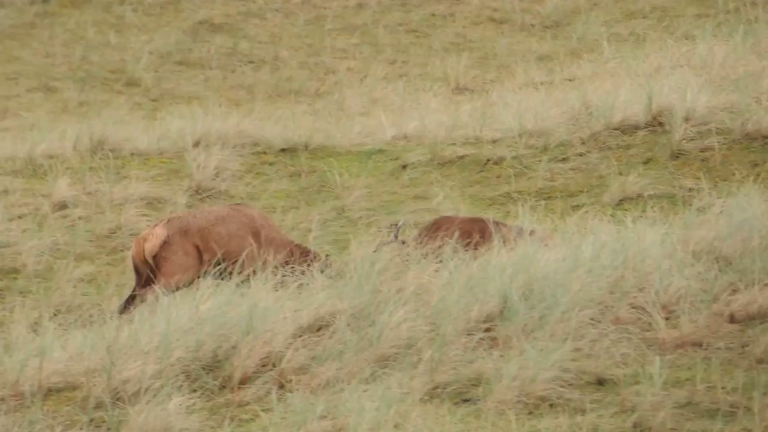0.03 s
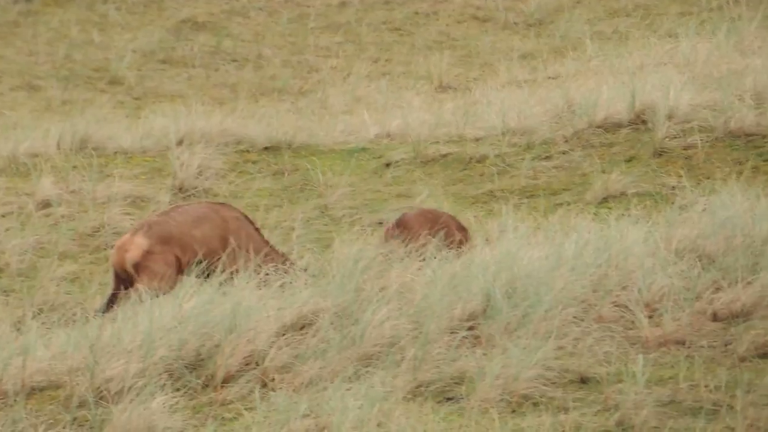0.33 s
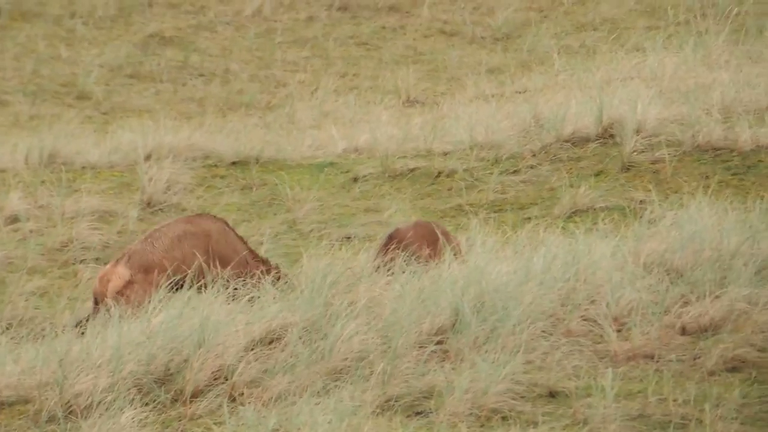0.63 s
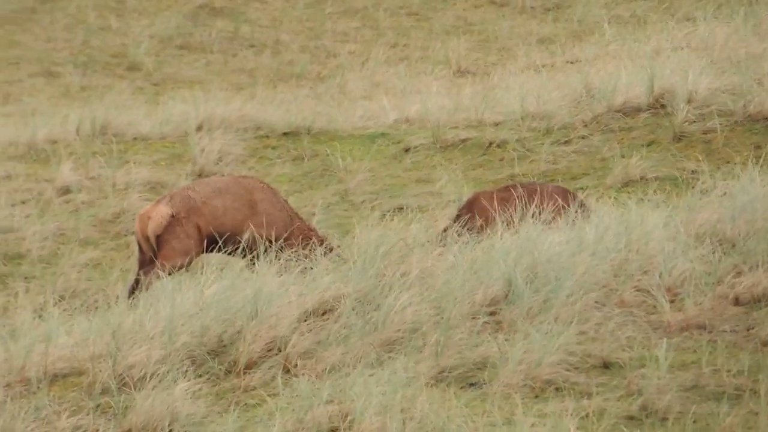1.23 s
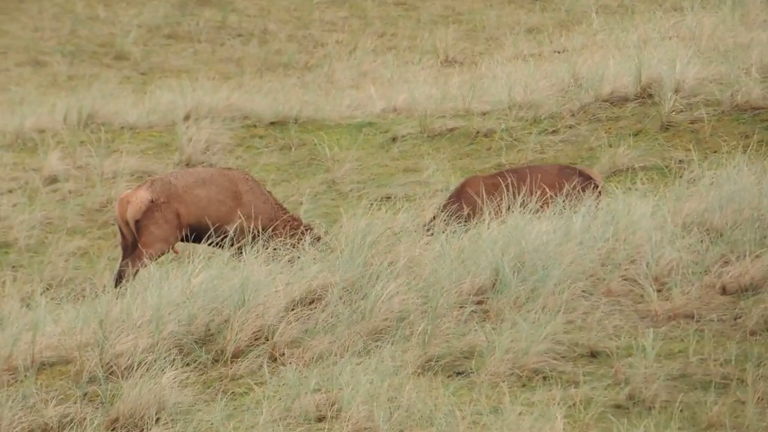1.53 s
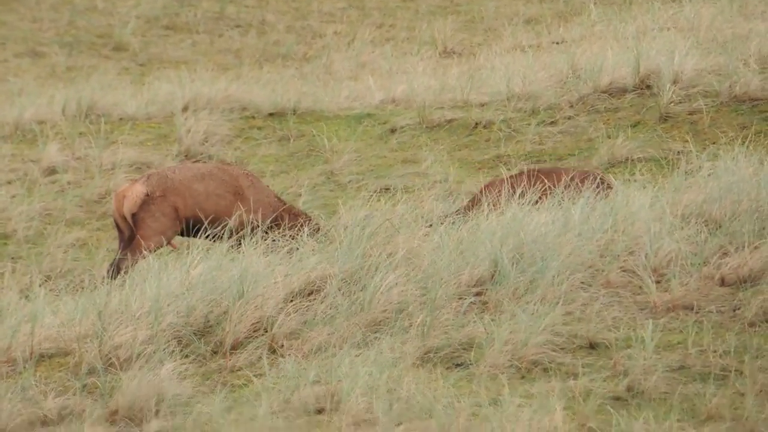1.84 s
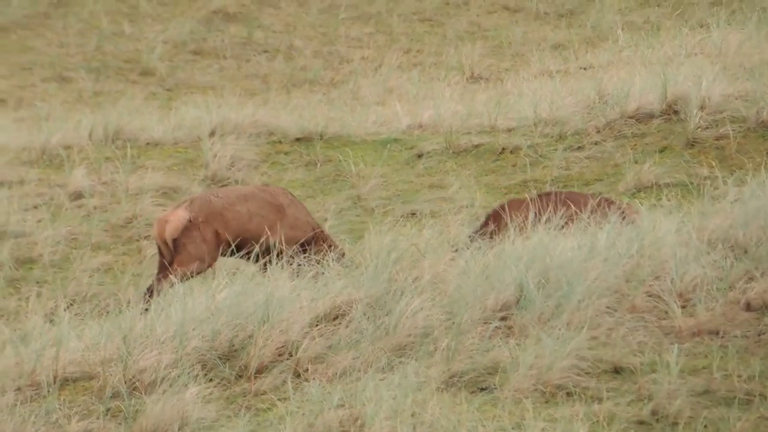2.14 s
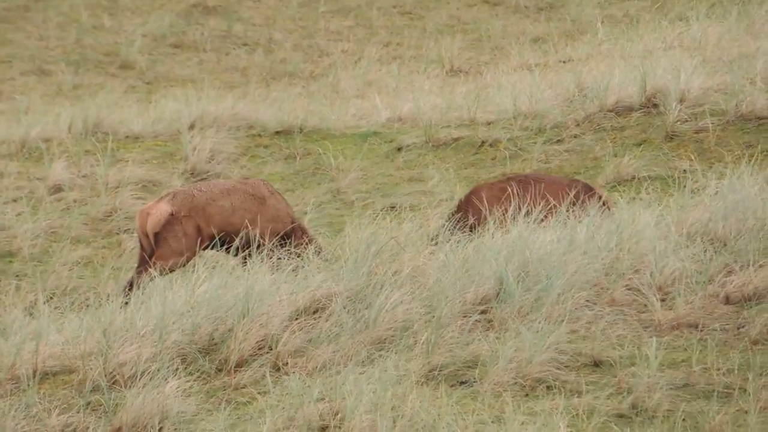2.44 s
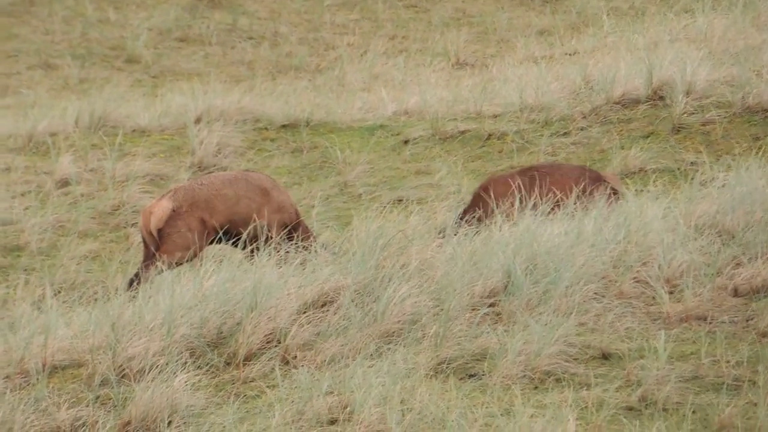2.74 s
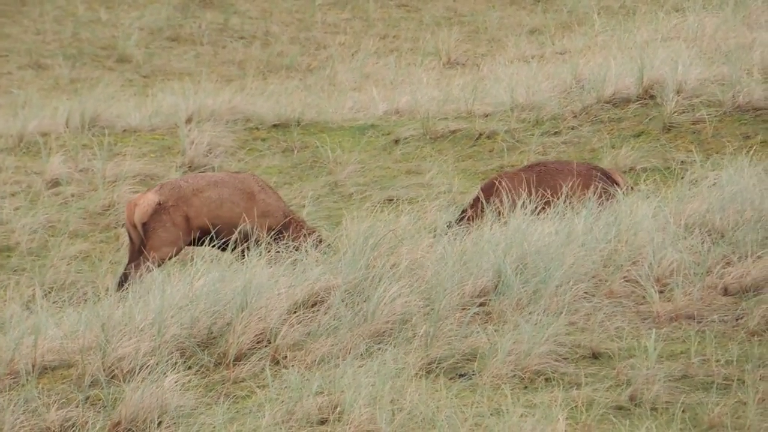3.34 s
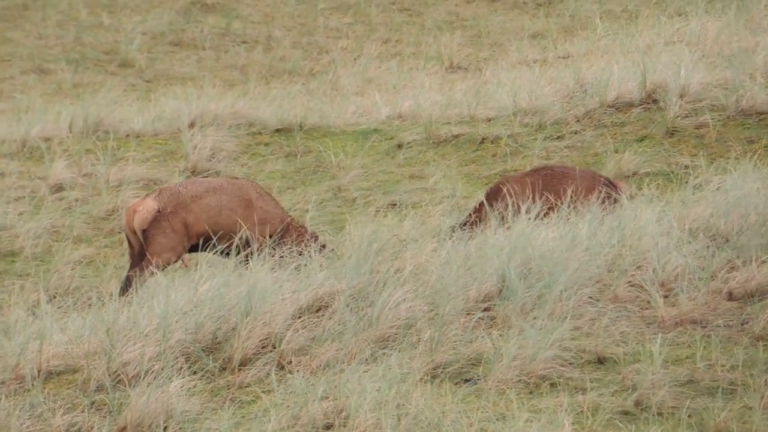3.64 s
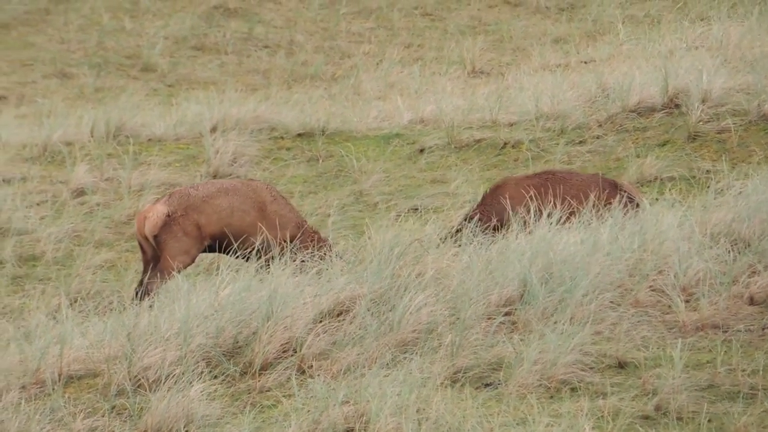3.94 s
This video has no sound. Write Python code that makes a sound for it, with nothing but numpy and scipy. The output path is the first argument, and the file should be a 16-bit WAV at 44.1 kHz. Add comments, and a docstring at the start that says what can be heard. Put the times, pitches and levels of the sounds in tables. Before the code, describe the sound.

Deer antlers click and knock unevenly while wind hisses and buffets the microphone.

```python
"""A grassy hillside in wind, with two stags sparring far off.
Dry knocks and ticks sound with no echo: perhaps antlers, perhaps drops tapping close to the microphone.
Each knock is an impulse ringing a damped body; each tick is a tiny burst of bright noise.
Wind buffets the two microphone ports separately, mostly the right, over faint scrapes and a steady hiss."""
import sys
import numpy as np
from scipy import signal
from scipy.fft import rfft, irfft
from scipy.io import wavfile
from scipy.ndimage import uniform_filter1d

SR = 44100
rng = np.random.default_rng(int(sys.argv[2]) if len(sys.argv) > 2 else 0)


def int16_out(signal):
    """Quantize to a 16-bit WAV file."""
    q = np.round(np.clip(np.atleast_2d(signal).T, -1, 1) * 32767)
    wavfile.write(sys.argv[1], SR, q.astype(np.int16))


N = 176400
SHORT = 2048  # samples in one tick or knock


def amp(db):
    """Decibels to gain."""
    return 10 ** (np.asarray(db) / 20)


def unit(x):
    """Scales to rms 1."""
    return x / np.sqrt(np.mean(x ** 2) + 1e-20)


def read(points, hz):
    """Reads a table on a log-frequency axis."""
    f, value = np.transpose(points)
    return np.interp(np.log(hz + 1), np.log(f + 1), value)


def add(mix, s, sound):
    """Adds a stereo sound at time s."""
    part = mix[:, max(round(s * SR), 0):][:, :sound.shape[1]]
    part += sound[:, :part.shape[1]]


def split(difference):
    """Shares a left-right difference between the two ports."""
    return np.array([[.5], [-.5]]) * difference


def mode(f, hz, q):
    """Response of one damped mode, gain 1 at its pitch."""
    u = 1j * f / hz
    return 1 / (q * (1 + u * u) + u)


def low_cut(f, hz):
    """Response of a gentle bass roll-off."""
    return 1j * f / (1j * f + hz)


def band_noise(hz, q, size):
    """Stereo noise in one broad resonance with steep sides."""
    f = np.fft.rfftfreq(size, 1 / SR)
    white = rfft(rng.standard_normal((2, size)))
    return unit(irfft(white * f * mode(f, hz, q) ** 2, size))


def air():
    """A soft wash of wind in grass, alike at both ports, turning into microphone hiss in the treble."""
    # Each row: frequency in Hz, relative spectral level in dB.
    spectrum = [(30, -6), (300, .3), (500, -2.3), (860, -3), (1600, -10.2), (3900, -15), (7800, -15.8),
                (14000, -16.2)]
    # Each row: frequency in Hz, correlation of left and right.
    correlation = [(60, .5), (380, .85), (950, .75), (2400, .3), (8000, .05)]
    # Each row: frequency in Hz, left minus right in dB.
    balance = [(200, -2.5), (5000, -.2), (14000, -1.5)]
    frames, hz = N // 256 + 5, np.fft.rfftfreq(1024, 1 / SR)
    a, b, c, d, patches = rng.standard_normal((frames, len(hz), 5)).T
    patches = unit(uniform_filter1d(uniform_filter1d(patches, size=12, axis=0), size=12, axis=1))
    swell = unit(uniform_filter1d(rng.standard_normal(frames), size=50))
    drift_db = 1.2 * patches + .4 * swell  # the wash wavers band by band and as a whole
    alike = read(correlation, hz)[:, None]
    left = a + 1j * b
    right = alike * left + np.sqrt(1 - alike ** 2) * (c + 1j * d)
    pan = amp(read(balance, hz) / 2)[:, None]
    bands = np.array([left * pan, right / pan]) * amp(read(spectrum, hz)[:, None] + alike * drift_db)
    _, wash = signal.istft(bands, nperseg=1024, noverlap=768)
    return amp(-49.6) * unit(wash[:, :N])


def wind():
    """Low turbulence right on the microphone, gusting separately at each port."""
    # One table a port. Each row: time in seconds, level in dB.
    left_gusts = [(.2, -45), (.75, -58), (1.1, -43), (1.8, -38), (2, -51), (2.5, -50), (2.84, -37),
                  (3.05, -50), (3.27, -38), (3.5, -52)]
    right_gusts = [(.1, -36), (.65, -45), (1.1, -33), (1.7, -29), (2.02, -37), (2.2, -34), (2.75, -39),
                   (3.1, -44), (3.25, -39), (3.42, -45), (3.75, -43), (3.9, -34)]
    # Each row: frequency in Hz, relative spectral level in dB.
    spectrum = [(10, -12), (25, -4), (55, 0), (85, -4), (125, -10), (190, -21), (320, -33), (2000, -80)]
    out, t, f = np.zeros((2, N)), np.arange(N) / SR, np.fft.rfftfreq(N, 1 / SR)
    for port, gusts in enumerate((left_gusts, right_gusts)):
        rumble = unit(irfft(rfft(rng.standard_normal(N)) * amp(read(spectrum, f)), N))
        out[port] = amp(np.interp(t, *np.transpose(gusts))) * rumble
    return out


def ticks(decay_s=.0012, pan_db=-4):
    """Tiny fizzy bursts, a little to the right, that die in a few milliseconds."""
    # Each row: start in seconds, level in dB, centre in Hz.
    bursts = [(.1566, -28, 5000), (1.5295, -30, 12000), (2.103, -31, 11000), (2.409, -29, 12000),
              (2.6713, -31, 11000), (3.0277, -26, 11500), (3.2063, -32, 8000)]
    out, fade = np.zeros((2, N)), np.exp(-np.arange(SHORT) / SR / decay_s)
    for s, db, hz in bursts:
        add(out, s, amp(db + split(pan_db)) * fade * band_noise(hz, q=.9, size=SHORT))
    return out


def buffets(half_width_cycles=1.2, roughness=.3):
    """An eddy passes one port: a low thud of two or three uneven pressure swings."""
    # Left port, then right. Each row: time of the peak in seconds, peak in dB, centre in Hz.
    eddies = {"left": [(.185, -27, 100), (2.8, -31, 130)], "right": [(.705, -35, 160), (1.135, -26, 120),
              (2.126, -22, 115), (2.168, -27, 145), (2.325, -24, 135), (2.363, -29, 175), (2.433, -31, 190),
              (2.466, -30, 160), (2.525, -27, 210), (2.549, -24, 190), (2.656, -33, 200), (2.696, -31, 240),
              (2.841, -28, 125), (2.863, -25, 135), (3.252, -28, 120), (3.291, -23, 115), (3.37, -33, 145),
              (3.837, -23, 120), (3.907, -29, 130)]}
    out, t = np.zeros((2, N)), np.arange(-SHORT, SHORT) / SR
    for port, rows in enumerate(eddies.values()):
        for s, db, hz in rows:
            noise = rng.standard_normal(len(t))
            wobble = unit(uniform_filter1d(uniform_filter1d(noise, size=70), size=70))
            turns = np.cumsum(hz * (1 + roughness * wobble)) / SR
            envelope = amp(db) * np.exp(-(t * hz / half_width_cycles) ** 2)
            thud = envelope * np.sin(2 * np.pi * turns)
            add(out, s + t[0], np.outer(np.arange(2) == port, thud))
    return out


def knock(db, hz, q=2, snap_db=-23, pan_db=-4):
    """An impulse rings a damped body and a snap, then a brief shiver."""
    hollow_hz, contact_hz = 680, 5500
    shiver_decay_s, lag_s_per_db = .0016, 2.1e-5
    f, t = np.fft.rfftfreq(SHORT, 1 / SR), np.arange(SHORT) / SR
    # Soft contact cuts the overtones steeply; hard contact lets more through.
    edge_hz = 1.7 * hz * (1 + amp(snap_db))
    contact = mode(f, edge_hz, q=1) * mode(f, edge_hz, q=np.sqrt(.5)) * np.sqrt(.5)
    body = mode(f, hz, q) * contact
    snap = amp(snap_db) * mode(f, hz=4400, q=1.3) * low_cut(f, hz=2500) * mode(f, contact_hz, q=1)
    # Every knock shares this low resonance; little sounds below it.
    hollow = mode(f, hollow_hz, q=1) * (1j * f / hollow_hz) ** 2 * low_cut(f, hollow_hz)
    click = amp(-22) / q * low_cut(f, contact_hz)
    tone = (body + snap) * hollow + click
    dying_noise = rng.standard_normal((2, SHORT)) * np.exp(-t / shiver_decay_s)
    shiver = amp(-10) * unit(dying_noise) / np.sqrt(SHORT)
    delay_s = .0001 - split(lag_s_per_db * pan_db)  # the nearer port hears it first
    strike = irfft(tone * (1 + rfft(shiver)) * np.exp(-2j * np.pi * f * delay_s))
    fade = np.hanning(2 * SHORT)[SHORT:]
    return -amp(db - .9 + split(pan_db)) * strike * fade


def knocks():
    """Hard knocks and the light taps that rattle between them, mostly to the right."""
    # Each row: start in seconds, relative level in dB, pitch in Hz, ring Q, snap gain in dB,
    # left minus right in dB. Short rows take the defaults of knock().
    strikes = [(.1865, -6, 1200), (.2655, -10, 1900), (.3753, -2, 1200, 1.4), (1.0149, 4, 1600, 5, -20),
               (1.0961, -2, 1700, 4.5), (1.1215, -1, 1800, 2.6, -11), (1.204, -9, 1200),
               (1.232, -7, 1750, 4), (1.2495, -7, 1300), (1.2925, -3, 1600, 2, -6, 0),
               (1.5297, 6, 1010, 4.5), (1.5358, -2, 1660), (1.5642, -2, 1550), (1.6415, -8, 1700),
               (1.6761, 13.5, 1750, 2.5, -21), (1.6956, -4, 2100, 1), (1.7396, 12, 1800, 2.5, -7, 0),
               (1.7739, 6, 560, 1.2), (1.9813, 5.5, 3500, 1, -24), (2.0948, 0, 1050, 3, -12),
               (2.1038, -6, 1150), (2.1223, 1, 2100, 1.1), (2.1525, -8, 1600), (2.1993, -5, 1300),
               (2.2976, 5, 1550, 1.3), (2.4522, 1.5, 1700, 2.8), (2.5, -11, 2200),
               (2.6713, -3, 1800, .9, -20, 4), (2.6954, 5, 2050, 5, -26, -2), (2.6957, 2, 950, 1.3),
               (2.7977, 0, 1730, 6, -30), (2.8395, 5, 2000, 2.7, -9, 2), (3.124, 2, 1550, 3.3, -28),
               (3.1725, 2, 1130), (3.324, 7, 3200, .58, -24), (3.4448, 5, 1020, 5, -32),
               (3.587, 7.5, 1520, 3.1, -28, -2), (3.6629, 1, 1300, 1.2, -13, -2)]
    out = np.zeros((2, N))
    for s, *row in strikes:
        add(out, s, knock(*row))
    return out


def scrapes(length_s=.038, grain_db=5.5):
    """Short grainy rubs of antler or dry grass, far from the microphone."""
    # Each row: start in seconds, level in dB, centre in Hz.
    rubs = [(.365, -52, 2000), (.66, -51, 3800), (.77, -48, 1100), (2.072, -50, 2400)]
    out, size = np.zeros((2, N)), round(length_s * SR)
    for s, db, hz in rubs:
        rub = band_noise(hz, q=.8, size=SR)[:, :size]
        rub = rub + .6 * rub[::-1]  # both ports hear much the same rub
        flicker = unit(uniform_filter1d(rng.standard_normal(SR), size=90))[:size]
        envelope = amp(grain_db * flicker) * np.hanning(size) ** .5
        add(out, s, amp(db) * unit(rub * envelope))
    return out


def scene():
    """The hillside as it reaches the two ports."""
    return air() + wind() + buffets() + ticks() + scrapes() + knocks()


def record(dry):
    """The microphone opens after a moment; the top of the treble is cut steeply."""
    start_s, fade_s, cutoff_hz = .102, .005, 14350
    opened = np.clip((np.arange(N) / SR - start_s) / fade_s, 0, 1)
    lowpass = signal.firwin(511, cutoff_hz, window=("kaiser", 9), fs=SR)
    return signal.oaconvolve(dry * opened, lowpass[None], "same")


dry = scene()
out = record(dry)
int16_out(out)
```